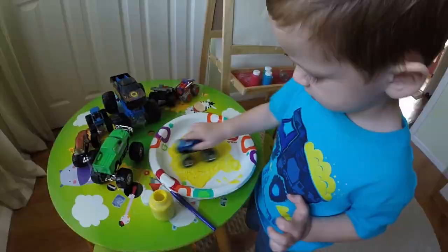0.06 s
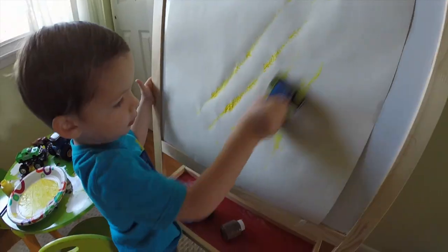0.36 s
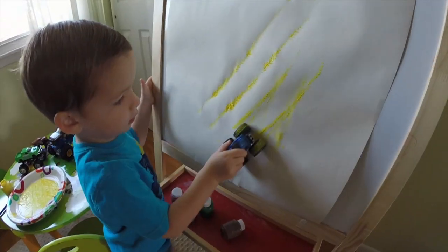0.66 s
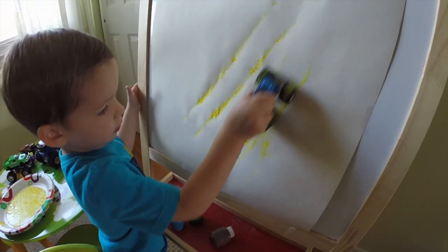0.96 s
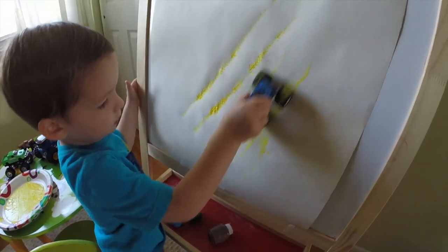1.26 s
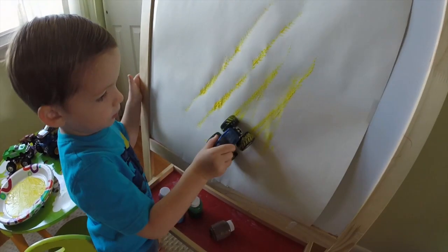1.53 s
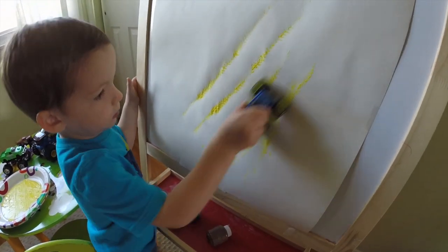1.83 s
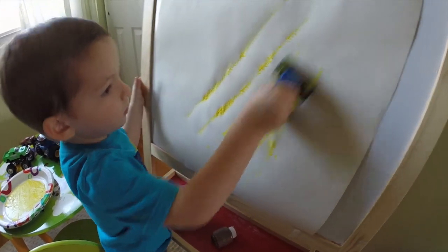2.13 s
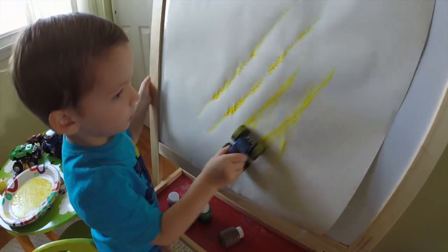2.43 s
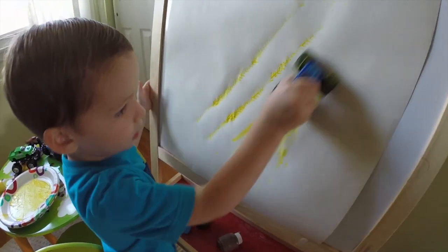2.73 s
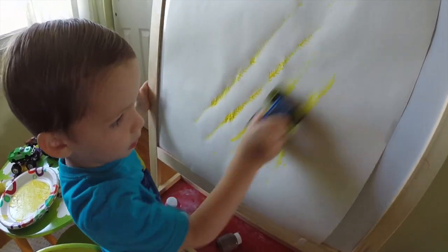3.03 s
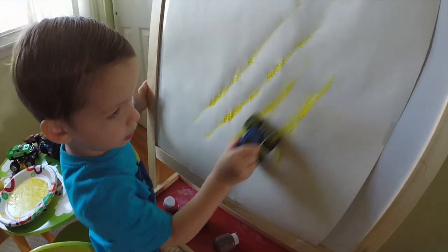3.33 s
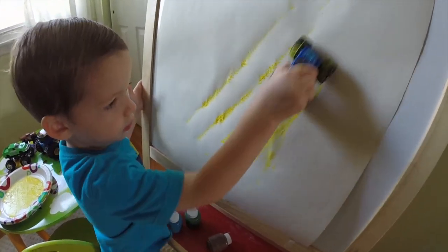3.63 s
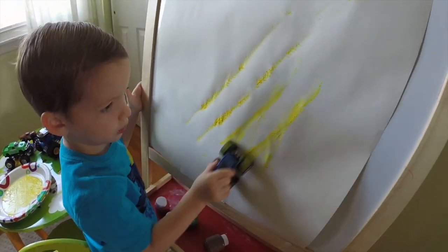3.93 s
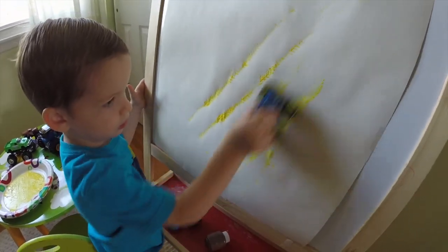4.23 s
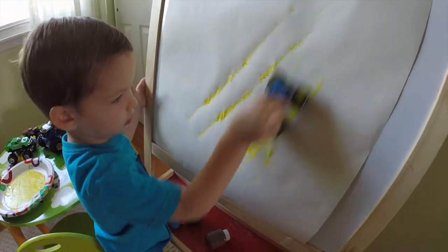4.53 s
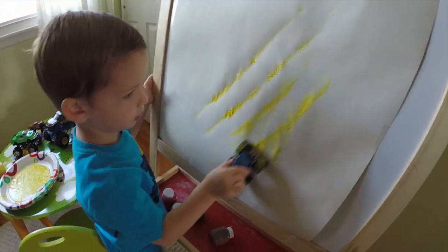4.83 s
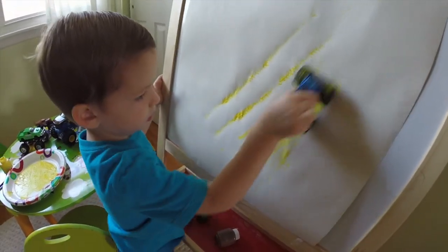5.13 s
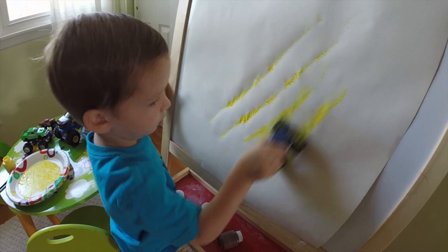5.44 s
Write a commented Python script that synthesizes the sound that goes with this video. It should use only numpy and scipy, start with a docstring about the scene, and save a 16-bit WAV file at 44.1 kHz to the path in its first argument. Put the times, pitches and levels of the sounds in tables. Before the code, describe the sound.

Quick, repeated strokes of a toy truck rumble and scrape across paper on an easel, its loose plastic wheels clicking.

```python
"""A toy truck with paint-wet rubber tyres, pushed up and down a sheet of paper on an easel.
One microphone stands close by, in a small furnished room. First the truck is handled and set down.
Then the tread lugs drum on the board, faster and harder in mid-stroke, the paper hisses and wet
paint crackles as it peels off the tread. The loose plastic wheels click on their axles, the tyres
bump the board, and once the wet rubber squeaks."""
import sys
import numpy as np
from scipy import signal
from scipy.fft import rfft, irfft, next_fast_len
from scipy.io import wavfile
from scipy.ndimage import uniform_filter1d

SR = 44100
rng = np.random.default_rng(int(sys.argv[2]) if len(sys.argv) > 2 else 0)


def wav_out(sig):
    """Save sig, one row per channel (or a flat mono array), as 16-bit PCM at SR to the path in sys.argv[1]."""
    wavfile.write(sys.argv[1], SR, np.round(np.clip(np.atleast_2d(sig).T, -1, 1) * 32767).astype(np.int16))


N = 250972
TIME = np.arange(N) / SR


def undb(db):
    """Decibels to gain."""
    return 10 ** (np.asarray(db) / 20)


def unit(x):
    """Scale to rms 1."""
    return x / np.sqrt(np.mean(x ** 2))


def steady(x, span_s):
    """Hold the rms near 1 over each span; quicker grain stays."""
    return x / np.sqrt(uniform_filter1d(x ** 2, int(span_s * SR)) + 1e-4 * np.mean(x ** 2))


def band(x, low_hz, high_hz, order=2):
    """Band-pass filter."""
    return signal.sosfilt(signal.butter(order, [low_hz, high_hz], "band", fs=SR, output="sos"), x)


def low_pass(x, hz):
    """The part of x below hz, without delay."""
    return signal.sosfiltfilt(signal.butter(3, hz, fs=SR, output="sos"), x)


def through(x, impulse):
    """Play x through an impulse response."""
    return signal.oaconvolve(x, impulse)[:len(x)]


def response(colour, modes=(), size=8192):
    """Minimum-phase impulse response of a broad colour with resonances standing on it."""
    hz = np.maximum(np.arange(size // 2 + 1) * SR / size, 1)
    corner_hz, corner_db = np.transpose(colour)
    gain = undb(np.interp(np.log(hz), np.log(corner_hz), corner_db))
    peaks = sum(undb(db) ** 2 / (1 + (2 * (hz - pitch_hz) / width_hz) ** 2) ** 2
                for pitch_hz, width_hz, db in modes)
    cepstrum = irfft(np.log(gain * np.sqrt(1 + peaks)))
    cepstrum[1:size // 2] *= 2
    cepstrum[size // 2 + 1:] = 0
    impulse = irfft(np.exp(rfft(cepstrum)))
    return impulse / np.linalg.norm(impulse)


def ringing(modes, t):
    """Decaying sines from rows of pitch_hz, level_db, t60_s."""
    return sum(undb(db - 60 * t / t60_s) * np.sin(2 * np.pi * hz * t) for hz, db, t60_s in modes)


def wander(per_s):
    """Glide between random values, per_s of them a second, at rms 1."""
    step = int(SR / per_s)
    held = np.repeat(rng.standard_normal(N // step + 1), step)
    return unit(uniform_filter1d(held, step)[:N])


def grains(per_s, spread_db):
    """Tiny slips and snaps at random moments, most small and a few large."""
    impulses = (rng.random(N) < per_s / SR) * rng.standard_normal(N)
    size_db = spread_db * np.minimum(rng.exponential(size=N), 4)
    return unit(impulses * undb(size_db))


def add(out, start_s, x):
    """Mix x into out from start_s."""
    i = int(start_s * SR)
    out[i:i + len(x)] += x[:max(N - i, 0)]


# The quiet room at the microphone: frequency_hz, level_db
ROOM_TONE_COLOUR = [(15, -4), (25, 1), (45, 0), (70, 2), (130, -1), (240, 5), (400, -11), (700, -12),
                    (1200, -17.5), (3000, -24.5), (5000, -28.5), (9000, -37), (15000, -42)]
def room_tone(level_db=-50.5):
    """A steady, low hush lies under everything."""
    return unit(through(rng.standard_normal(N), response(ROOM_TONE_COLOUR))) * undb(level_db)


# Fingers on the toy: frequency_hz, level_db
RUSTLE_COLOUR = [(60, -6), (250, 1), (900, 7), (1500, -3.5), (2500, -10.5), (4300, -9), (6000, -20),
                 (10000, -26), (15000, -29)]
# The truck shifts in the hand, then is set down on the paper: peak_s, level_db, attack_s, decay_s
TOUCHES = [(.066, -49, .018, .05), (.247, -43.5, .004, .04)]
def handling(hold_db=-65):
    """Fingers and tyres rustle faintly as the truck is held before the first stroke."""
    slips = grains(per_s=5000, spread_db=1.9) * undb(1.5 * wander(69))
    rustle = steady(through(slips, response(RUSTLE_COLOUR)), span_s=.045)
    touches = sum(undb(db) * np.exp(-np.maximum((peak_s - TIME) / attack_s, (TIME - peak_s) / decay_s))
                  for peak_s, db, attack_s, decay_s in TOUCHES)
    holding = undb(hold_db) * (TIME < STROKES[0][0])
    return rustle * np.hypot(touches, holding)


# The easel's board under the paper: frequency_hz, level_db
BOARD_COLOUR = [(30, -28), (55, -14), (90, -3.5), (130, -4), (190, -1), (290, -5.7), (390, 0), (480, -5),
                (600, -7), (780, -13.5), (1100, -19.5), (1500, -26), (3000, -38.5), (8000, -70)]
# Its resonances: pitch_hz, width_hz, gain_db
BOARD_MODES = [(144, 12, -8), (212, 12, -1), (243.8, 12, 0), (360, 14, 2), (398, 13, 3), (432, 14, -3),
               (539, 14, 2.5), (572, 14, -6), (609, 14, -1.5), (849, 18, 3), (1224, 36, 0)]
# The truck's heaviest bumps: start_s, level_db, relative_thud_db
BUMPS = [(0.058, -39, -3), (0.245, -29, -3), (0.255, -30, -3), (0.28, -35, -6), (0.481, -26, -8),
         (0.509, -19, -14), (0.518, -18, -14), (0.902, -34, -6), (1.145, -22, -10), (1.475, -25, -1),
         (1.761, -39, -3), (2.306, -18, -17), (2.77, -16, -16), (3.557, -19, -12), (4.251, -26, -13),
         (4.348, -21, -12), (4.42, -17, -12), (4.726, -13, -15), (4.892, -20, -16), (5.096, -23, -19),
         (5.229, -19, -12), (5.492, -25, -10)]
def bumps(trim_db=-1.5, thud_hz=86, thud_s=.015):
    """Soft rubber blows ring the board and rock the easel's frame."""
    board = response(BOARD_COLOUR, BOARD_MODES)
    board /= np.abs(board).max()
    out, t = np.zeros(N), TIME[:len(board)]
    thud = np.sin(2 * np.pi * thud_hz * t) * np.exp(-t / thud_s)
    for start_s, level_db, thud_db in BUMPS:
        add(out, start_s, undb(level_db + trim_db) * (board + undb(thud_db) * thud))
    return out


# Truck and table top ringing together: pitch_hz, level_db, t60_s
CLACK_MODES = [(221, 4, .18), (650, -2, .05), (867, 1, .06), (1030, 1, .05), (1265, -5, .07),
               (2040, -10, .05), (3558, -7, .1), (3800, -7, .05), (4447, -11, .04), (6121, -16, .05),
               (8500, -11, .025), (9205, -17, .08), (11300, -15, .03)]
def table_clack(start_s=.0708, level_db=-41, crack_db=-5.5, crack_s=.005):
    """Hard plastic meets the table top: a bright crack, and both ring on."""
    out, t = np.zeros(N), TIME[:SR // 4]
    crack = unit(band(rng.standard_normal(len(t)), 3000, 12000)) * np.exp(-t / crack_s)
    add(out, start_s, undb(level_db) * (ringing(CLACK_MODES, t) + undb(crack_db) * crack))
    return out


# The truck's plastic shell: pitch_hz, level_db, t60_s
SHELL_MODES = [(1283, 3.5, 0.034), (2042, 6, 0.027), (2386, -2, 0.016), (3290, 0, 0.033), (3540, 2, 0.032),
               (4450, -10, 0.034), (6120, -10, 0.012), (9205, -26.5, .05)]
# The loudest clicks of wheels and body: start_s, level_db, treble_db
LOUD_CLICKS = [(0.173, -42, -29), (0.517, -24, -31), (0.5384, -24, -35), (0.5764, -29, -28),
               (0.6004, -28, -33), (0.6814, -29.5, -34), (0.7216, -30, -31), (1.1428, -33, -34),
               (1.3527, -37.5, -30), (1.6065, -29, -34), (2.535, -31.5, -35), (2.7727, -31, -25),
               (3.2851, -30, -31), (3.3703, -39, -26), (3.5643, -28, -26), (3.6192, -27, -22),
               (3.934, -23.5, -17), (4.0008, -21, -37), (4.0561, -32, -30), (4.348, -33, -29),
               (4.7257, -26, -23), (4.8179, -25, -28), (4.8987, -27.5, -25), (5.282, -30, -37),
               (5.5483, -28, -28), (5.6259, -24.5, -31)]
def wheel_clicks(small_clicks, trim_db=-.5, ring_gain=.26, crack_db=2, crack_s=.0025,
                 snap_db=10.5, snap_s=.0009, scatter_db=4):
    """A wheel knocks on its axle: a short crack, a treble snap and a ring of the shell."""
    out, t = np.zeros(N), TIME[:SR // 12]
    pitch_hz, mode_db, t60_s = np.transpose(SHELL_MODES)
    for start_s, level_db, treble_db in LOUD_CLICKS + small_clicks:
        # the grip and the point of impact change the ring from click to click
        detune, weight = rng.standard_normal((2, len(pitch_hz)))
        shell = ringing(zip(pitch_hz * (1 + .01 * detune), mode_db + scatter_db * weight, t60_s), t)
        crack = unit(band(rng.standard_normal(len(t)), 1200, 3600)) * np.exp(-t / crack_s)
        snap = unit(band(rng.standard_normal(len(t)), 5500, 10500)) * np.exp(-t / snap_s)
        click = ring_gain * shell + undb(crack_db) * crack + undb(snap_db + treble_db) * snap
        add(out, start_s, undb(level_db + trim_db) * click / np.abs(click).max())
    return out


# Pushes along the paper: start_s, speed_up_s, hold_s, slow_down_s, top_lug_hz, effort_db, wetness_db
STROKES = [(.386, .157, 0, .305, 135, -.4, .3), (.765, .315, 0, .195, 116, -4, 2.8),
           (1.296, .245, 0, .195, 122, -2.8, 1.8), (1.64, .405, 0, .185, 100, -7, 0),
           (2.206, .105, .075, .21, 170, -2.7, .4), (2.577, .147, .085, .206, 144, -2.9, -1.3),
           (3.036, .165, 0, .257, 145, -.1, -.3), (3.355, .22, .052, .189, 149, -2.8, -2.2),
           (3.775, .153, .04, .228, 175, -.3, -.4), (4.125, .275, 0, .2, 150, -1.2, .8),
           (4.561, .195, .045, .19, 152, 1.3, 3), (4.89, .265, .065, .208, 125, -3.1, -1.9),
           (5.393, .154, 0, .255, 130, -1.3, 2.8)]
def arm_strokes(turn_lug_hz=30, blend_s=.04):
    """The arm's swing goes from 0 at each turn to 1 at full speed, and the lug rate follows it."""
    strokes = np.array(STROKES)
    ramps = np.array([np.interp(TIME, np.cumsum(row[:4]), [0, 1, 1, 0]) for row in strokes])
    arcs = np.sin(np.pi / 2 * ramps)
    swing = arcs.max(axis=0)
    under_way = strokes[arcs.argmax(axis=0)]
    top_lug_hz, effort_db, wet_db = uniform_filter1d(under_way.T[4:], int(blend_s * SR))
    lug_hz = turn_lug_hz + (top_lug_hz - turn_lug_hz) * swing
    return swing, lug_hz, effort_db, wet_db


def follow_arm(swing, effort_db, full_db, drop_db, per_effort, lag_s=0, fade_s=.1):
    """A level in dB that fades in for the first stroke, grows with effort and drops at each turn."""
    start_s = STROKES[0][0]
    fade_db = np.interp(TIME, [start_s - fade_s, start_s], [-60, 0])
    level_db = full_db - drop_db * (1 - swing) + per_effort * effort_db
    return np.interp(TIME - lag_s, TIME, level_db) + fade_db


def tread_strikes(lug_hz, wobble=.025, jitter_lugs=.08, scatter_db=3.3, lean_db=5, max_lugs=1500):
    """Each of four wheels strikes once per lug, a little unevenly; the hand leans mostly on one."""
    strikes = np.zeros(N)
    for wheel in range(4):
        lugs_passed = np.cumsum(lug_hz * np.exp(wobble * wander(9))) / SR + rng.random()
        lateness, force = rng.standard_normal((max_lugs, 2))[:int(lugs_passed[-1])].T
        at = np.searchsorted(lugs_passed, np.arange(len(force)) + jitter_lugs * lateness)
        strikes[at.clip(0, N - 1)] += undb(scatter_db * force - lean_db * wheel)
    return strikes


def disperse(x, delay_s=.011, at_hz=400):
    """Bending waves cross a board more slowly the lower they are, so each blow is drawn out."""
    size = next_fast_len(len(x) + SR // 4)
    hz = np.arange(size // 2 + 1) * SR / size
    phase_lag = 4 * np.pi * delay_s * np.sqrt(at_hz * hz)
    return irfft(rfft(x, size) * np.exp(-1j * phase_lag), size)[:len(x)]


def board_resonance(drive, travel_lugs, node_lugs=22, at_hz=480):
    """The board's modes gather the energy and ring on; each fades as the truck crosses its node lines."""
    shake = drive
    for hz, width_hz, gain_db in BOARD_MODES:
        # node lines lie closer together for higher modes
        nodes_crossed = travel_lugs / node_lugs * np.sqrt(hz / at_hz) + rng.random()
        coupling = np.abs(np.sin(np.pi * nodes_crossed))
        mode = signal.lfilter(*signal.iirpeak(hz, hz / width_hz, fs=SR), drive * coupling)
        shake = shake + undb(gain_db) * mode
    return unit(shake) * np.std(drive)


def drumming(strikes, lug_hz, soft_db, hard_db, scuff_db=-9, split_hz=480,
             squash_gain=2.2, squash_hz=130, brisk_lug_hz=135):
    """Lug blows and scuffing rubber shake the board; hard blows reach higher, slow ones stay deep."""
    blows = unit(strikes - uniform_filter1d(strikes, SR // 40))
    scuff = undb(scuff_db) * rng.standard_normal(N)
    push = through(disperse(blows + scuff), response(BOARD_COLOUR))
    push = band(push, 35, 1260, order=3)
    # a slow lug has time to squash, which lengthens its push
    slowness = np.clip(1 - lug_hz / brisk_lug_hz, 0, .5)
    push = push + squash_gain * slowness * low_pass(push, squash_hz)
    soft = low_pass(push, split_hz)
    drive = steady(soft, span_s=.04) * undb(soft_db) + steady(push - soft, span_s=.04) * undb(hard_db)
    return board_resonance(drive, travel_lugs=np.cumsum(lug_hz) / SR)


# Rubber dragging on paper: frequency_hz, level_db
PAPER_COLOUR = [(400, -15.5), (800, -1.5), (1220, 3), (1600, -.8), (2500, -3.3), (3500, -8.3), (5000, -17),
                (8000, -31), (15000, -44)]
def paper_hiss(strikes, drag_s=.0034, grip=.4, patchy_db=1.4):
    """Each lug drags briefly over the paper fibres."""
    contact = unit(through(strikes, np.exp(-TIME[:SR // 20] / drag_s)))
    slips = grains(per_s=14000, spread_db=2.1) * (1 + grip * contact) * undb(patchy_db * wander(70))
    return steady(through(slips, response(PAPER_COLOUR)), span_s=.06)


# Wet paint peeling, heard close: frequency_hz, level_db
PAINT_COLOUR = [(500, -9), (1500, -3), (3500, 5), (5500, -4), (8000, -4), (10500, -12), (15000, -17)]
def paint_crackle():
    """Threads of wet paint snap as the tread lifts, over a fine hiss."""
    snaps = grains(per_s=1200, spread_db=3.2) + rng.standard_normal(N)
    return steady(through(snaps, response(PAINT_COLOUR)), span_s=.068)


def wheel_rattle(swing, rub_db, top_per_s=24, over_rub_db=10, scatter_db=2, treble_db=-30, tries=400):
    """Loose wheels click at random, most in mid-stroke: rows of start_s, level_db, treble_db."""
    at = rng.integers(0, N, tries)
    heard = rng.random(tries) < top_per_s * swing[at] * N / SR / tries
    level_db = rub_db[at] + over_rub_db + scatter_db * rng.standard_normal(tries)
    return [(i / SR, db, treble_db) for i, db in zip(at[heard], level_db[heard])]


# A tyre catches on the paper: peak_s, extra_drum_db, extra_scrape_db, extra_crackle_db
GRABS = [(.523, 3.5, 14, 1), (.703, 6, 3, 0), (1.072, 2.5, 5, 1), (1.511, 1.5, 5.5, 4), (1.6, 3, 3, 0),
         (2.081, 1, 3.5, 0), (2.345, 5.5, 8, 3), (2.675, 4.5, 1, 0), (2.784, 4, 8, 5), (2.858, 0, 5, 0),
         (3.167, 3.5, 3, 1), (3.328, 6, .5, 0), (3.462, 7.5, 2.5, 2), (3.61, 4.5, 9, 4), (3.932, 3, 7, 2.5),
         (4.004, 0, 6, 8), (4.257, 6, .5, 0), (4.384, 4.5, 6, 3.5), (4.453, .5, 7.5, 11),
         (4.742, 3.5, 9.5, 10), (4.902, 3, 11, 1), (5.29, 0, 4.5, 0), (5.542, .5, 5.5, 1)]
def tyre_grabs(sigma_s=.016):
    """A tyre presses harder for a moment: bell-shaped rises in dB of drumming, scrape and crackle."""
    peak_s, *rises_db = np.transpose(GRABS)
    swells = np.exp(-((TIME - peak_s[:, None]) / sigma_s) ** 2 / 2)
    return np.array(rises_db) @ swells


def rubber_squeak(start_s=2.339, pitch_hz=4450, length_s=.018, peak_db=-38, roughness=.08):
    """Wet rubber sticks and slips very fast for a moment, at an unsteady pitch."""
    out, n = np.zeros(N), int(length_s * SR)
    phase = 2 * np.pi * np.cumsum(pitch_hz * (1 + roughness * wander(900)[:n])) / SR
    envelope = np.sin(np.pi * np.sqrt(np.arange(n) / n)) ** 2
    add(out, start_s, undb(peak_db) * envelope * np.sin(phase))
    return out


def small_room(direct, tail_db=-9.5, bass_t60_s=.27, treble_t60_s=.22, gap_s=.0045,
               split_hz=900, bass_db=-4):
    """A short diffuse tail reaches the microphone; in the bass the nearby board outweighs it most."""
    t = TIME[:SR // 2]
    noise = rng.standard_normal(len(t))
    low = low_pass(noise, split_hz)
    bass = low * undb(bass_db - 60 * t / bass_t60_s)
    treble = (noise - low) * undb(-60 * t / treble_t60_s)
    tail = (bass + treble) * (t > gap_s)
    reverb = through(direct, tail / np.linalg.norm(tail))
    return (direct + undb(tail_db) * reverb) / np.hypot(1, undb(tail_db))


def scene(lag_s=.014):
    """The truck and the room from beside the easel, in mono; paper and paint trail the board by lag_s."""
    swing, lug_hz, effort_db, wet_db = arm_strokes()
    press_db, scrape_db, crackle_db = tyre_grabs()
    soft_db = follow_arm(swing, effort_db, full_db=-21.7, drop_db=31.8, per_effort=.95)
    hard_db = follow_arm(swing, effort_db, full_db=-30.8, drop_db=31.2, per_effort=1.5)
    rub_db = follow_arm(swing, effort_db, full_db=-42.2, drop_db=26, per_effort=1.6, lag_s=lag_s)
    paint_db = follow_arm(swing, effort_db, full_db=-63.2, drop_db=14.8, per_effort=.55, lag_s=lag_s)
    strikes = tread_strikes(lug_hz)
    board = drumming(strikes, lug_hz, soft_db + press_db, hard_db + scrape_db)
    paper = paper_hiss(strikes) * undb(rub_db + .8 * scrape_db + .45 * wet_db)
    paint = paint_crackle() * undb(paint_db + wet_db + crackle_db)
    air = room_tone()
    truck = handling() + board + paper + paint + rubber_squeak()
    knocks = bumps() + table_clack() + wheel_clicks(wheel_rattle(swing, rub_db))
    return (small_room(truck + knocks) + air)[None]


def record(dry, top_hz=15100):
    """The camera behind the microphone cuts the top of the treble steeply."""
    return signal.sosfilt(signal.ellip(8, .2, 70, top_hz, fs=SR, output="sos"), dry)


dry = scene()
out = record(dry)
wav_out(out)
```